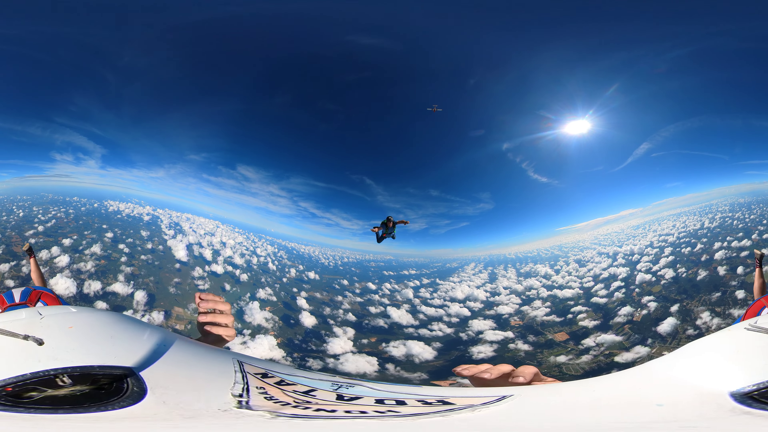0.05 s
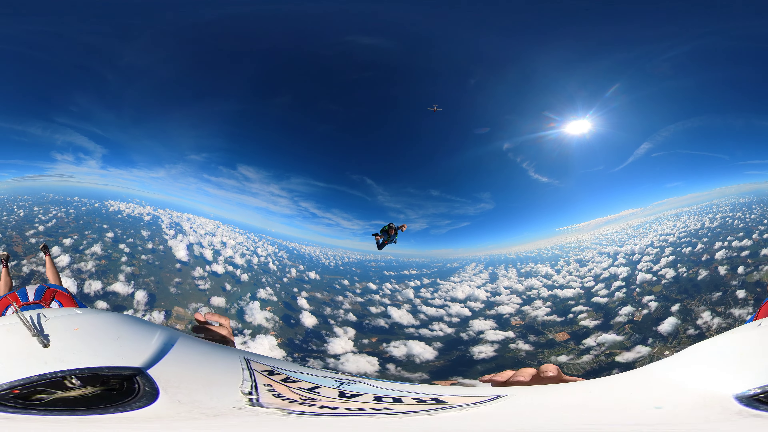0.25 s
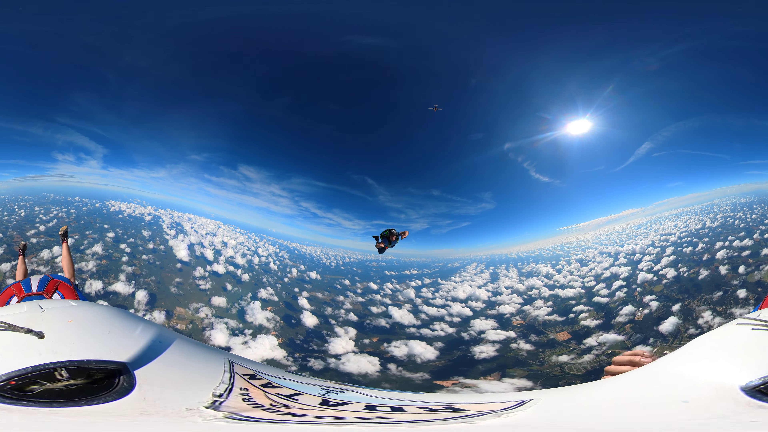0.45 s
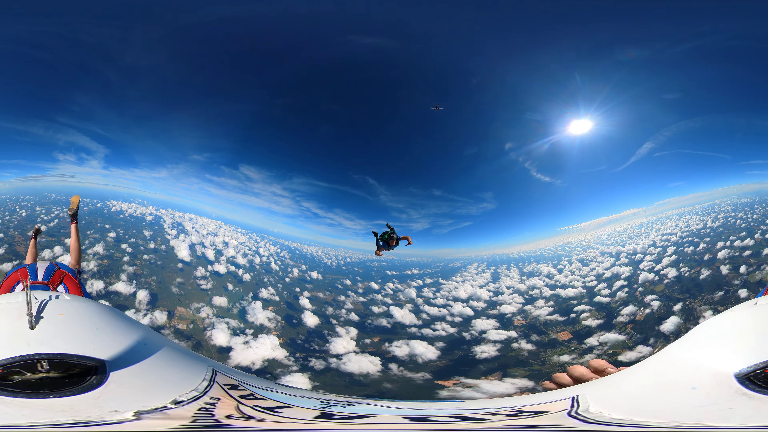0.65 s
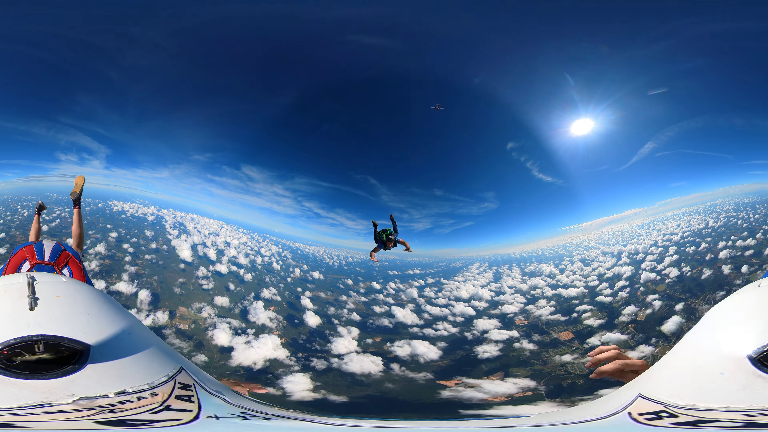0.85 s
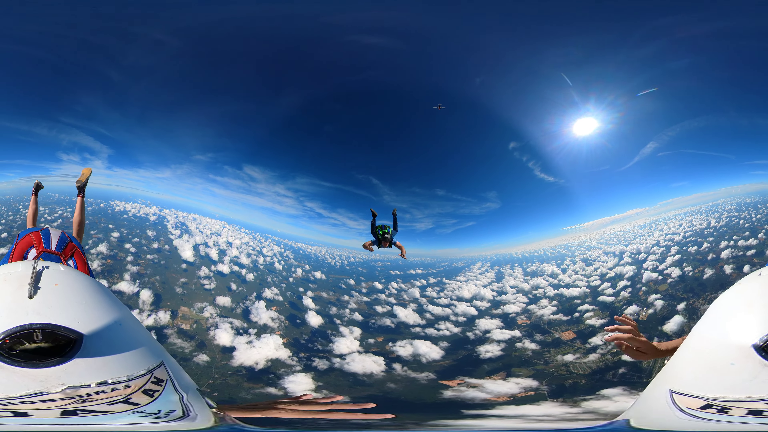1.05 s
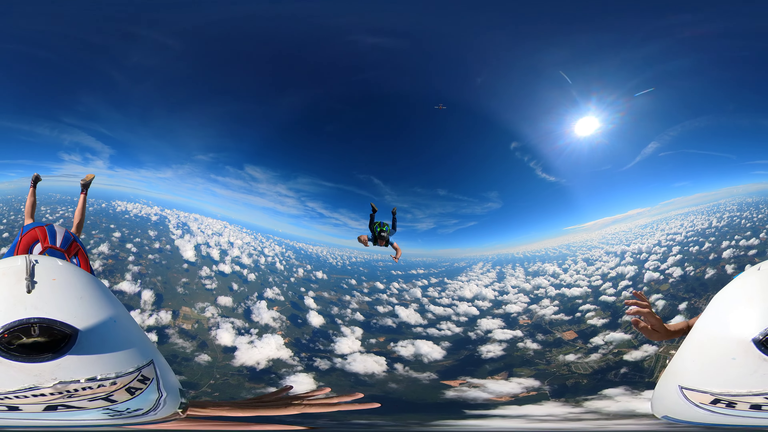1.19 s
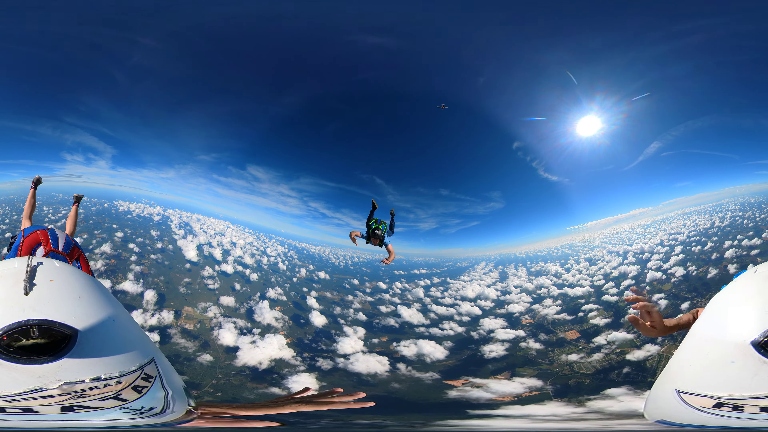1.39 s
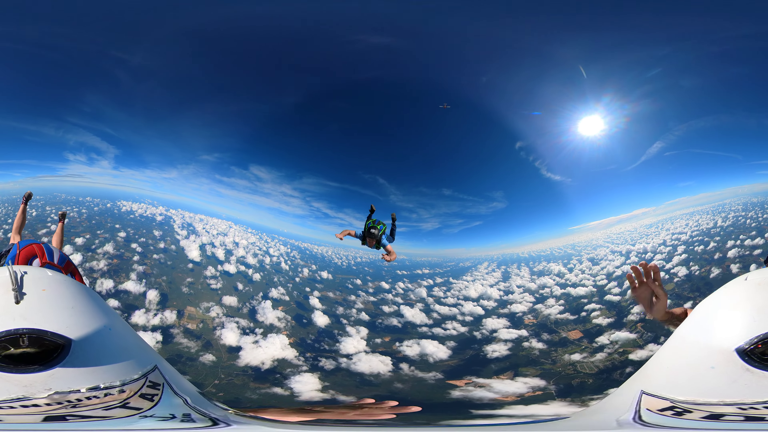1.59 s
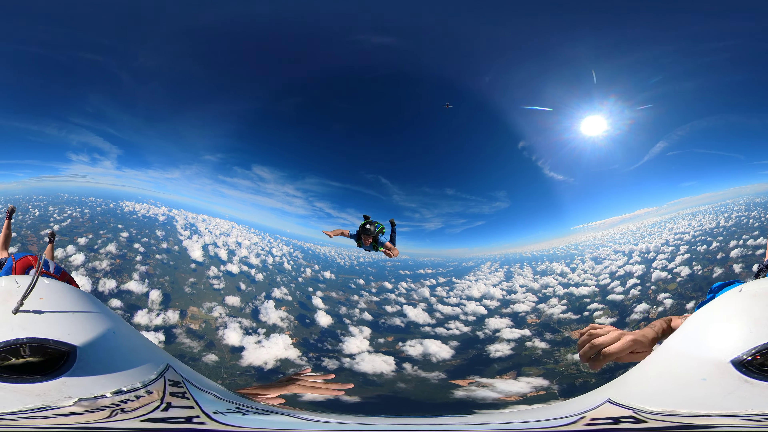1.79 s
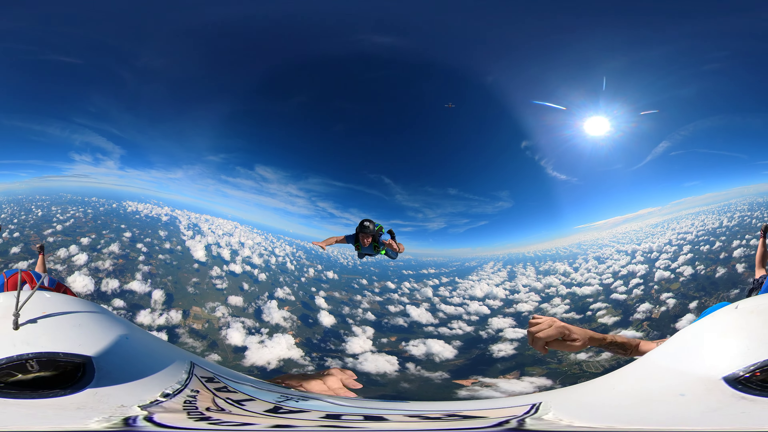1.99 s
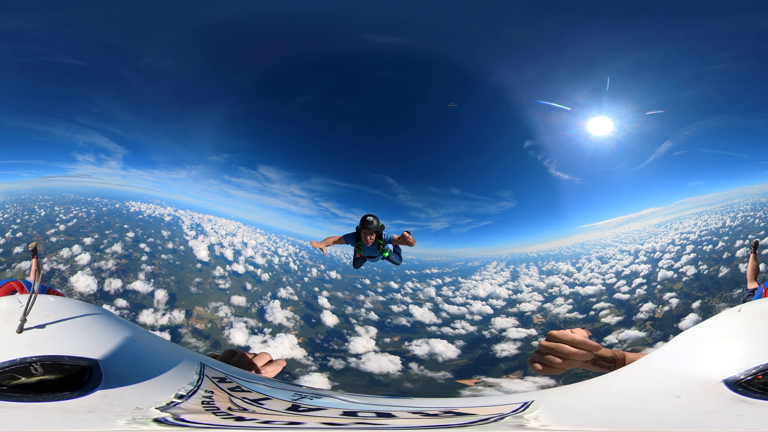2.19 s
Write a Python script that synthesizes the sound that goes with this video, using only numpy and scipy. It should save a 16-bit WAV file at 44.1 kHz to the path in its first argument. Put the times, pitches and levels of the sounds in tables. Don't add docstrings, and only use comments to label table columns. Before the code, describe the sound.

Constant buffeting wind overloads a body-worn camera microphone high in the air, a dull, bassy roar chopped by tiny dropouts and flutters, with a brief lull and smoother surge midway and nothing else clearly heard.

```python
import sys
import numpy as np
from scipy import signal
from scipy.io import wavfile
from scipy.ndimage import uniform_filter1d

SR = 44100
rng = np.random.default_rng(int(sys.argv[2]) if len(sys.argv) > 2 else 0)


def log_audio(samples):
    frames = np.atleast_2d(samples).T
    limited = np.clip(frames, -1, 1)
    pcm = np.round(limited * 32767).astype(np.int16)
    wavfile.write(sys.argv[1], SR, pcm)


def volts_from_decibels(level):
    exponent = np.asarray(level, float) / 20
    return 10 ** exponent


N = 98695

# (time [s], level [dB], fine eddies [dB], freedom from the stop [0-1])
AIRFLOW = [(0, -22, -11.5, .35), (.4, -21.5, -15.5, .35), (.44, -19, -16.5, 0.2), (.5, -22.5, -27.5, .4),
           (.55, -25, -12, .2), (.72, -23, -8.5, .15), (.8, -20, -11.5, .3), (.95, -21.5, -12.5, .4),
           (.97, -23.5, -34.5, .9), (1.01, -16.5, -18.5, .9), (1.05, -31, -28.5, .9),
           (1.09, -32.5, -27, .9), (1.14, -25.5, -41, .9), (1.2, -13, -20.5, .8), (1.29, -20, -18, .7),
           (1.33, -23, -24.5, .3), (1.75, -21.5, -23.5, 0.27), (2.24, -21, -20, .3)]
# (time [s], length [s])
PINNED_MOMENTS = [(0, .004), (1.56, 0.0078), (1.813, 0.0022), (2.076, .0027), (2.2362, .003), (.598, .002),
                  (1.495, .002), (0.192, 0.0017), (0.24, 0.0048), (0.335, 0.0034), (0.538, 0.0019),
                  (0.55, 0.0016), (.585, 0.0019), (0.631, 0.0038), (0.654, .006), (0.678, 0.0045),
                  (0.748, 0.01), (1.362, .004), (1.369, .003), (1.405, 0.0037), (1.525, 0.0028),
                  (1.554, 0.0027), (1.676, 0.0074), (1.946, 0.013), (1.999, 0.0053), (2.062, 0.0026),
                  (2.064, 0.0037), (2.107, 0.0073), (2.133, 0.0013), (2.188, 0.0056), (2.218, 0.006)]
# (frequency [Hz], level per Hz [dB])
PRESSURE_SPECTRUM = [(20, -2), (60, 2.5), (130, 1.5), (260, 4.5), (640, -6.5), (950, -17.5), (1900, -30.5),
                     (3000, -50.5)]
# (time [s], peak [dB])
GAIN_STEPS = [(.067, -66), (.387, -63), (.407, -61), (.567, -62), (.637, -62), (.647, -64), (.737, -63),
              (.777, -62), (.827, -65), (.927, -66), (.997, -66), (1.167, -60), (1.187, -57), (1.297, -61),
              (1.337, -63), (1.377, -60), (1.617, -61), (1.637, -64), (1.707, -59), (1.787, -64),
              (1.847, -63), (1.987, -62), (2.037, -63), (2.147, -61)]
# (time [s], depth over the roar [dB], width [ms])
EDDY_SUCKS = [(0.0082, 10.2, 1.7), (0.0723, 15.5, 1.24), (0.0935, 10, 1.35), (0.1396, 9, 1.7),
              (0.1622, 5.5, 0.4), (0.183, 4.5, 0.55), (0.2181, 11, 0), (0.2336, 9, 0.13),
              (0.2875, 6.5, 0.9), (0.3009, 10, 1.3), (0.3286, 12, 1.1), (0.3434, 6.5, 0.4),
              (0.4392, 9.5, 1.2), (0.4673, 7, 1.3), (0.5796, 10.5, 0.8), (0.605, 1, 0.19),
              (0.6424, 16.5, 0.84), (0.6852, 9.5, 0.67), (0.6974, 10, 0.6), (0.7185, 10.1, 0.42),
              (0.7336, 10, 1), (0.7471, 12.5, 0.35), (0.7796, 8.5, 0.27), (0.7912, 16, 0.72),
              (0.8001, 8.5, 0.88), (0.8059, 11.5, 0.8), (0.8192, 16, 1.5), (0.8415, 7, 0.67),
              (0.8606, 10, 0.17), (0.9006, 8, 2), (0.9117, 6, 0), (0.9305, 11, 0.89), (0.9854, 9, 0.56),
              (0.9998, 7, 0.68), (1.0071, 7.5, 1.4), (1.0231, 8, 0.62), (1.1559, 12, 1.4), (1.1912, 9.1, 1),
              (1.207, 4.5, 0.55), (1.4325, 10.5, 2.43), (1.487, 9, 1.86), (1.5082, 11.5, 1.6),
              (1.5477, 1, 1.2), (1.5735, -4, 0.72), (1.5922, 6, 0.49), (1.62, 14, 1.3),
              (1.6283, 13.5, 1.12), (1.6597, 13, 1.25), (1.753, 7, 1.3), (1.7762, 5.5, 1.45),
              (1.7909, 1.5, 1.7), (1.797, 7.5, 1.9), (1.8414, 5, 0.62), (2.0399, 8.5, 1.2),
              (2.073, 4.5, 1.2), (2.0793, 6.5, 1.9), (2.118, 15.5, 0.6), (2.1663, 6.5, 0.26),
              (2.1773, 11.5, 1.17), (2.214, 6, 0.0),
              (0.0284, 11, 0), (0.0376, 6.5, 1), (0.0599, 6.5, -1.5), (0.088, 11, 1.4), (0.1004, 10, 0.9),
                (0.1153, 10, 1.5), (0.16, 4.5, 1.5), (0.1939, 5, 0), (0.226, 8, 0.5), (0.316, 11.5, 0.3),
                (0.3893, 13.5, 1.2), (0.3937, 7.5, 2), (0.4324, 6, 2.7), (0.4475, 7, 2.5), (0.5179, 5.5, 8),
                (0.5584, 7.0, 1.5), (0.583, 5, 1.5), (0.5898, 3.5, 0.4), (0.6259, 10.5, 1.8),
                (0.6377, 2.5, 0), (0.6474, 9, 0.5), (0.6709, 10, 2.2), (0.7875, 6.5, 2.2),
                (0.851, 8.0, 2.1), (0.8569, 5.5, 0), (0.9429, 6.5, -1), (0.949, 9, -0.3), (1.164, 8.5, 3),
                (1.1677, 9, 0), (1.201, 6, 1), (1.255, 12, 1), (1.2643, 11, 0), (1.3482, 12, 1.3),
                (1.367, 5, -5.8), (1.3852, 9, 1.5), (1.4379, 8.1, 2.5), (1.4789, 9, 1.3), (1.5031, 6, 0.5),
                (1.5771, 6, 1), (1.596, 9, 2), (1.648, 4.5, 1.3), (1.6554, 4.5, 0.7), (1.6923, 12, 1.3),
                (1.6981, 6, 0.8), (1.7605, 8, 1.3), (1.7644, 5, 1.3), (1.8002, 8, 1.2), (1.8695, 7.2, 1),
                (1.8946, 11, 1.5), (1.9128, 11.5, 1.6), (1.9256, 6.5, 0), (1.9976, 4.5, 1.7),
                (2.0258, 10.5, 0.4), (2.0445, 5, 3.3), (2.0684, 10, 0.3), (2.0858, 10.5, 1.2),
                (2.0931, 8.5, 0), (2.1882, 7.3, 2), (2.2239, 11, 0.2), (2.233, 1, -2.7)]
# (time [s], half length [s], level [dB], extra above the rumble [dB])
SWELLS = [(0.102, 0.023, 1, 3.5), (0.263, 0.018, -6, 5), (0.294, 0.024, 3.5, -1), (.395, .015, 2, -5.5),
          (0.485, 0.0072, 3, -0.5), (0.513, .012, 3, 0.5), (0.53, 0.012, -1, -2), (0.583, .012, 1.5, -4.5),
          (0.869, 0.0085, -11, 0.5), (1.085, .035, 2, -2), (0.443, .02, 0.5, 2.5), (0.207, 0.053, 0, 2.5),
          (.97, .04, -0.5, 3.5), (1.803, 0.034, 0, 2), (1.225, .04, -2.5, 4), (1.161, .015, 3, 4),
          (1.416, 0.0073, -3.5, 2), (1.433, 0.0059, 4, 7), (1.456, 0.011, -10, 3), (1.484, .004, -0.5, 6),
          (1.577, 0.013, 3, 4.5), (1.674, .012, -8, 5.5), (1.768, 0.03, 0.5, 5.5), (1.827, 0.015, 4.5, -4),
          (1.937, 0.014, 7, -8), (1.971, 0.018, -3, -10), (2.043, 0.015, 3, -0.5),
          (2.109, 0.0054, -17.5, 6.5), (2.202, .02, -0.5, 3)]


def rms_one(x):
    return x / np.sqrt(np.mean(x ** 2) + 1e-20)


def cut(x, hz, kind, order=2):
    return signal.sosfilt(signal.butter(order, hz, kind, fs=SR, output="sos"), x)


def drift(hz):
    r = np.exp(-40 * np.pi * hz / SR)
    noise = rng.standard_normal(N // 20 + 1002)
    slow = signal.lfilter([1], [1, -2 * r, r * r], noise)[1000:]
    return np.interp(np.arange(N) / 20, np.arange(len(slow)), rms_one(slow))


def hiss():
    noise = rms_one(cut(rng.standard_normal(N), 2500, "low", order=1))
    return volts_from_decibels(-92 + 5 * drift(14)) * noise


def crackle():
    grid_step, level_db, spread_db = 128, -53.5, 8
    s, free = np.transpose(AIRFLOW)[[0, 3]]
    free_now = np.interp(np.arange(N) / SR, s, free)
    threshold = .7 + 3 * (free_now - .3)
    on = (np.arange(N) % grid_step == 0) & (drift(45) > threshold)
    sizes = volts_from_decibels(level_db + spread_db * np.tanh(rng.standard_normal(N)))
    signs = rng.choice([-1, 1], N)
    return cut(on * sizes * signs + 1e-18, 4600, "low", order=2)


def gain_ticks():
    first_s, every_s, level_db, spread_db = .0072, .01, -60, 5
    clicks = np.zeros(N)
    beat = np.arange(first_s, N / SR, every_s)
    draw = rng.standard_normal((len(beat), 2))
    clicks[(beat * SR).astype(int)] = volts_from_decibels(level_db + spread_db * draw[:, 0]) * np.sign(draw[:, 1])
    s, peak_db = np.transpose(GAIN_STEPS)
    clicks[(s * SR).astype(int)] = volts_from_decibels(peak_db + 22)
    return cut(clicks + 1e-18, 4600, "low", order=3)


def housing_rumble():
    return volts_from_decibels(-16.5) * rms_one(cut(rng.standard_normal(N), 130, "low"))


def turbulence(eddies_db):
    fine_from_hz, fine_full_hz = 390, 1500
    shared_db, own_db = 1, 2.5
    shared = drift(26.1)
    white = rng.standard_normal((2, N + SR))
    at_hz, at_db = np.transpose(PRESSURE_SPECTRUM)
    edges = 18 * 2 ** np.arange(0, 8, .5)
    out = 0
    for k, (low, high) in enumerate(zip(edges, edges[1:])):
        hz = np.sqrt(low * high)
        fine = np.clip(np.log(hz / fine_from_hz) / np.log(fine_full_hz / fine_from_hz), 0, 1.2)
        gain_db = np.interp(np.log(hz), np.log(at_hz), at_db) + fine * eddies_db
        gain_db = gain_db + shared_db * shared + own_db * drift(8.5)
        out = out + volts_from_decibels(gain_db) * cut(white[k % 2], [low, high], "band")[SR:]
    return rms_one(out)


def sucks(t):
    s, db, ms = np.transpose(np.array(EDDY_SUCKS))[:, :, None]
    free = np.interp(s, *np.transpose(AIRFLOW)[[0, 3]])
    width = np.maximum(ms, .55 + 1.2 * free ** 2) * 0.55 / 1000
    depth = volts_from_decibels(np.minimum(db, 10.5) - 1 - 5 * free ** 2)
    pull = (depth * np.exp(-((t - s) / width) ** 2)).sum(axis=0)
    near = np.exp(-((t - s) / (width + 3.6 / 1000)) ** 2).max(axis=0)
    return pull, 1 - 0.6 * near


def pinning(t):
    edge_s, extra_s, push = 0.00091, 0.0011, 3.5
    pull, lead_s, pull_s = 1.2, 0.0032, 0.001
    s, length = np.transpose(PINNED_MOMENTS)[:, :, None]
    since_start, until_end = t - s + extra_s / 2, s + length + extra_s / 2 - t
    held = np.clip(np.minimum(since_start, until_end) / edge_s + .5, 0, 1)
    suck = np.sqrt(length / length.mean()) * np.exp(-((t - s + lead_s) / pull_s) ** 2)
    return push * held.max(axis=0) - pull * suck.sum(axis=0)


def capsule(pressure, push):
    knee = .27
    return -knee * np.logaddexp(0, -(pressure + push) / knee)


def wind_filter(travel):
    run_in = 4000
    before = np.arange(-run_in, 0) / SR
    early_suck = 3.4 * np.exp(-((before + 0.0033) / 0.002) ** 2)
    x = np.concatenate([travel[run_in:0:-1] - early_suck, travel])
    x = cut(x, 45, "high", order=1)
    x = cut(x, 46.3, "high")
    x = cut(x, 2100, "low", order=4)
    return cut(x, 2816, "low", order=10)[run_in:]


def swells(t, x):
    s, half, db, extra_db = np.transpose(SWELLS)[:, :, None]
    bell = np.exp(-((t - s) / half) ** 2)
    low = cut(x, 402, "low")
    low = cut(low[::-1], 402, "low")[::-1]
    above = volts_from_decibels((extra_db * bell).sum(axis=0)) * (x - low)
    return volts_from_decibels((db * bell).sum(axis=0)) * (low + above)


def wind():
    t = np.arange(N) / SR
    s, *columns = np.transpose(AIRFLOW)
    level_db, eddies_db, free = [np.interp(t, s, c) for c in columns]
    pressure = turbulence(eddies_db - eddies_db.mean())
    pull, calm = sucks(t)
    push = 0.76 - 3.82 * free + 0.36 * drift(13.3) + pinning(t)
    leak = volts_from_decibels(-29) * pressure
    roar = wind_filter(capsule(calm * pressure - pull, push) + leak)
    loudness = np.sqrt(uniform_filter1d(roar ** 2, size=SR // 8) + 1e-9)
    rumble = cut(cut(housing_rumble(), 46.3, "high"), 2816, "low", order=10)
    return volts_from_decibels(level_db) * swells(t, roar / loudness + rumble)


def scene():
    return (hiss() + crackle() + gain_ticks() + wind())[None]


def band_limit(x):
    return signal.sosfilt(signal.butter(12, 15940, fs=SR, output="sos"), x)


def record(dry):
    dip_hz, top_hz = 15270, 15760
    mirror = dry * np.cos(2 * np.pi * 16000 * np.arange(N) / SR)
    upper = cut(mirror, [dip_hz + 300, top_hz], "band", order=4)
    lower = volts_from_decibels(-3) * cut(mirror, [13000, dip_hz], "band", order=14)
    return band_limit(dry + volts_from_decibels(-61) * (upper + lower))


dry = scene()
out = record(dry)
log_audio(out)
```